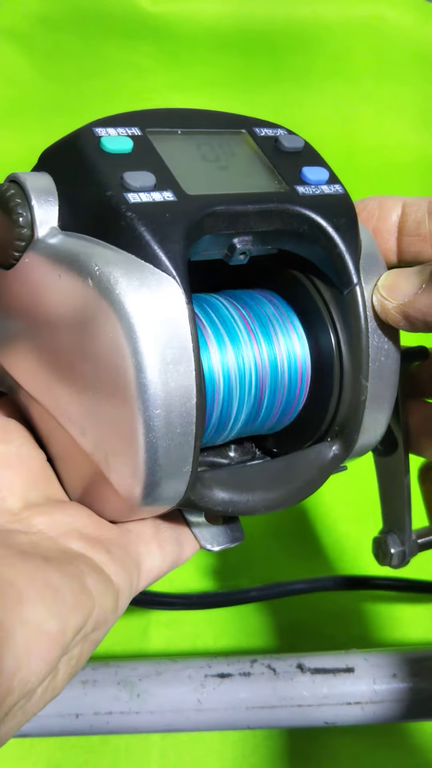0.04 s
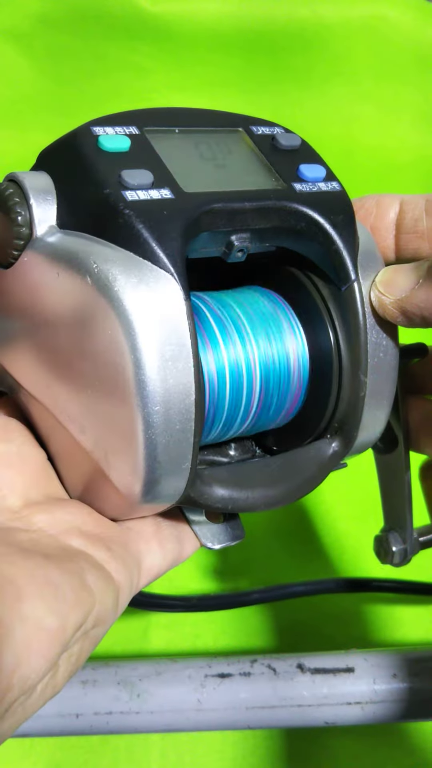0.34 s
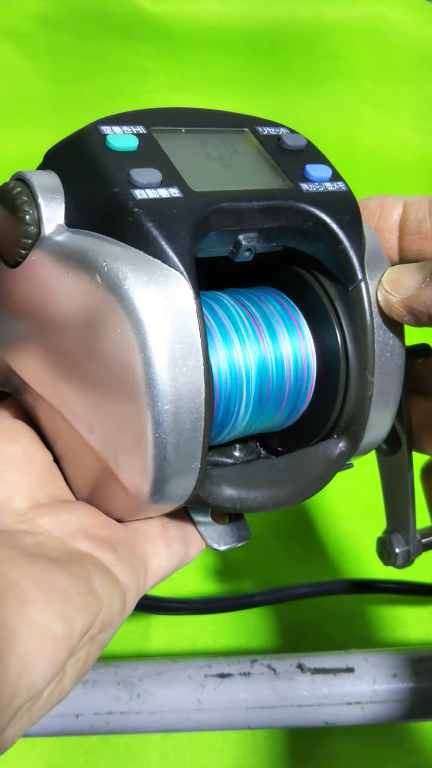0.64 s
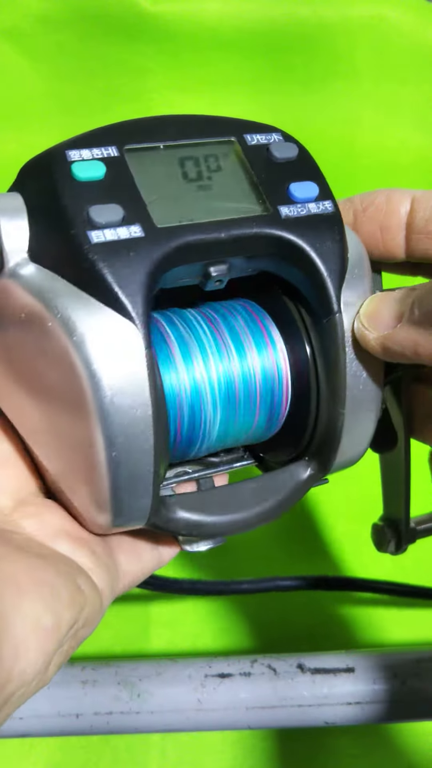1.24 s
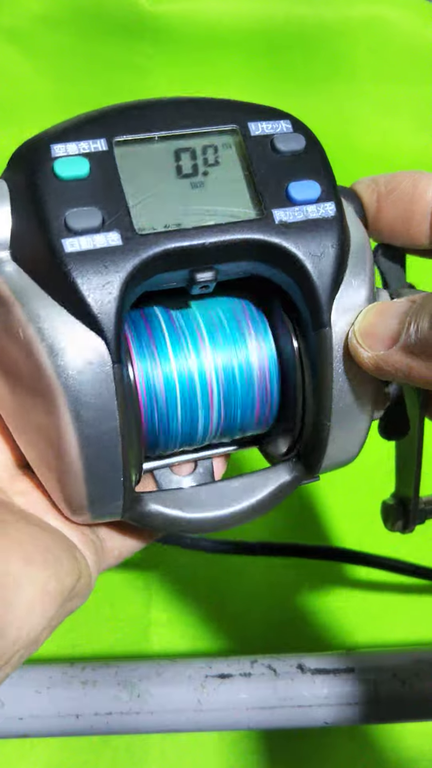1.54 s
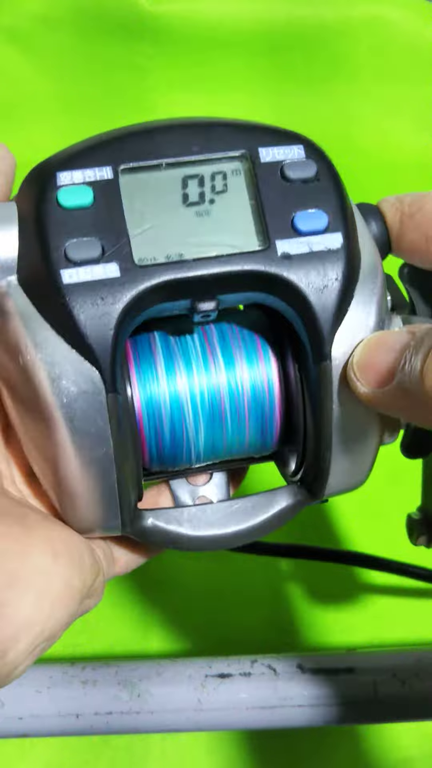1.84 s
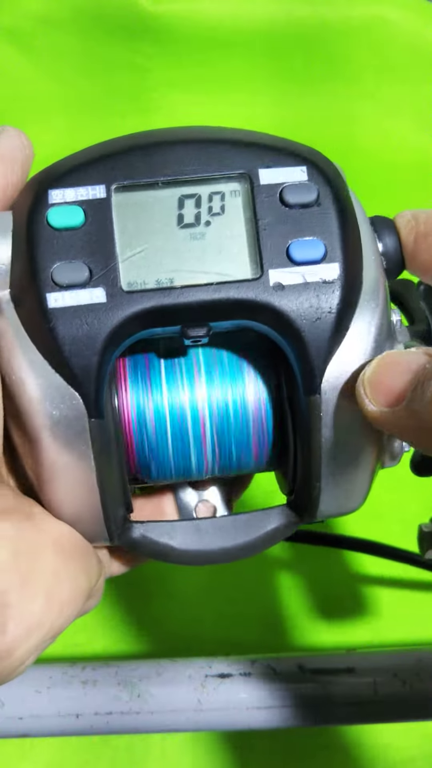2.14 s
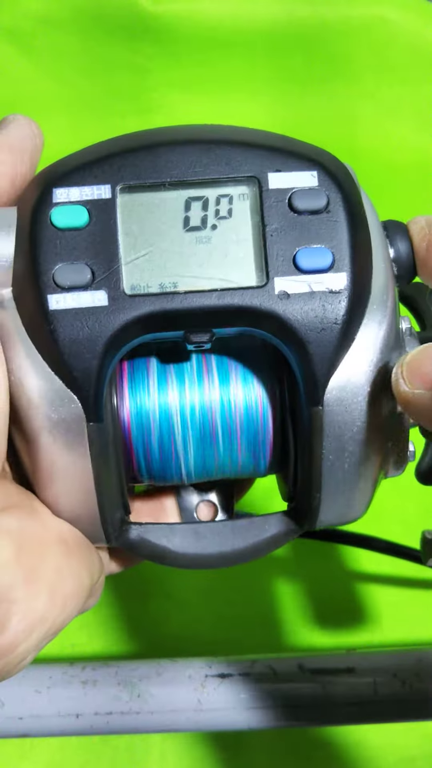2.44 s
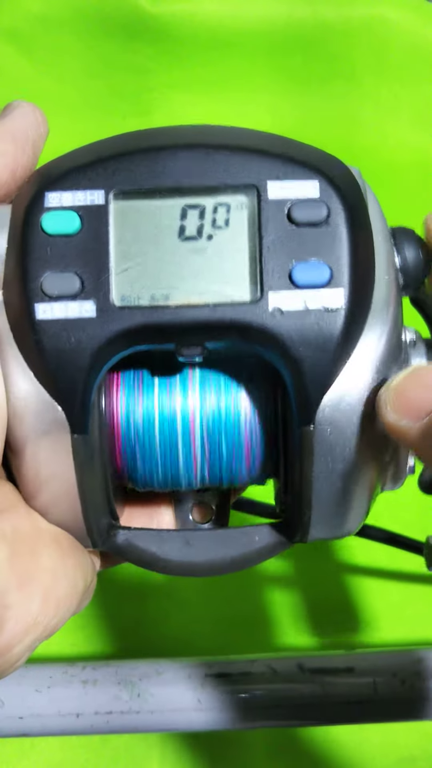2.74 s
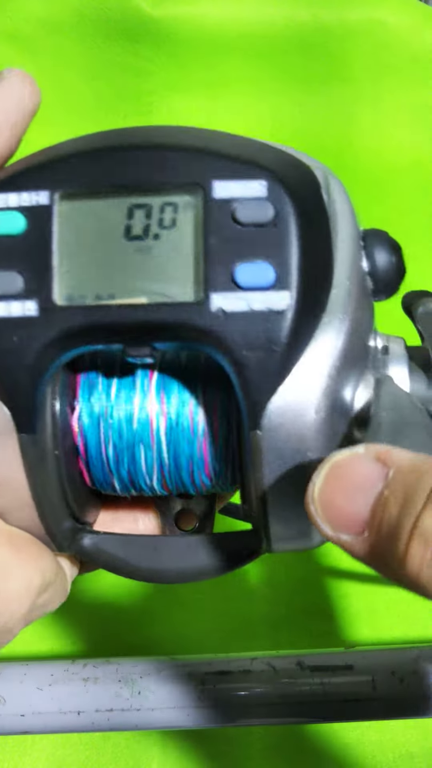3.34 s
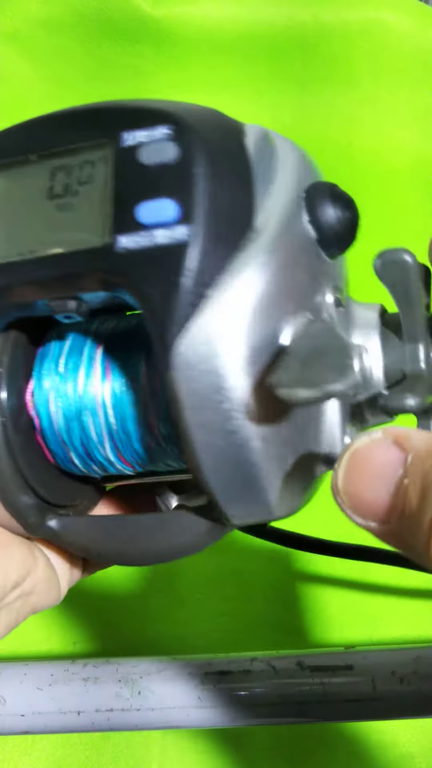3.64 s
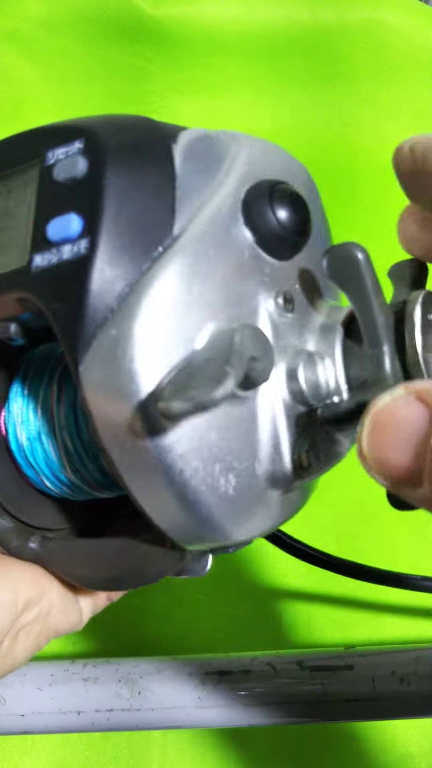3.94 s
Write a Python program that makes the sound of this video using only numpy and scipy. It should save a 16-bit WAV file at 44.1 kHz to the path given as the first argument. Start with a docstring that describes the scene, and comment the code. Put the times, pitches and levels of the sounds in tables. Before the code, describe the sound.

A small electric fishing reel motor whirs and rattles, then winds down to a stop.

```python
"""The small motor of a hand-held electric fishing reel spins its unloaded spool, close by: the rotor
hums, the mesh whines and gear teeth rattle the housing. The hand turns the reel from side plate to
front, which changes the colour of the whirr. At 2.7 s the power is cut and the reel coasts to rest,
growing duller. A few soft handling bumps and ticks remain over the mains hum of a quiet room."""
import sys
import numpy as np
from scipy import signal
from scipy.fft import rfft, irfft, next_fast_len
from scipy.io import wavfile
from scipy.ndimage import map_coordinates

SR = 44100
rng = np.random.default_rng(int(sys.argv[2]) if len(sys.argv) > 2 else 0)


def master(y):
    """Save y as 16-bit WAV."""
    cut = np.clip(np.atleast_2d(y).T, -1, 1)
    pcm = np.round(cut * 32767)  # scale
    wavfile.write(sys.argv[1], SR, pcm.astype(np.int16))


N = 176400
TIME_S = np.arange(N) / SR


def amp(db):
    return 10 ** (np.asarray(db) / 20)


def unit_rms(x):
    return x / np.sqrt(np.mean(x ** 2) + 1e-20)


def along(points, hz):
    """Interpolate (freq_hz, value) rows on a log axis."""
    freqs, values = np.transpose(points)
    return np.interp(np.log(hz + 1), np.log(freqs + 1), values)


def curve(rows):
    """One value per sample from (time_s, value) rows."""
    return np.interp(TIME_S, *np.transpose(rows))


def wobble(knots_per_s):
    """Smooth random curve of about unit size."""
    return map_coordinates(rng.standard_normal(4000), [TIME_S * knots_per_s], mode="wrap")


def filtered(x, response):
    """Apply a complex frequency response."""
    size = next_fast_len(N + SR // 2)
    return irfft(rfft(x, size) * response(np.fft.rfftfreq(size, 1 / SR)), size)[..., :N]


def coloured(x, *spectra):
    """Minimum-phase filter from summed (freq_hz, gain_db) spectra."""
    size = 2 * next_fast_len(N // 2 + SR // 4)
    hz = np.fft.rfftfreq(size, 1 / SR)
    gain = amp(sum(along(spectrum, hz) for spectrum in spectra))
    cepstrum = irfft(np.log(gain + 1e-6))
    cepstrum[1:size // 2] *= 2
    cepstrum[size // 2 + 1:] = 0
    return irfft(rfft(x, size) * np.exp(rfft(cepstrum)), size)[..., :N]


# stereo width: freq_hz, side_gain_db
STEREO_WIDTH = [(3000, -78), (4100, -83.5), (5200, -37), (6200, -14), (8000, -5.5), (11000, -6),
                (14000, -9.5)]

def stereo(pair):
    """Mid and side to left and right; the side widens only the treble."""
    side = filtered(pair[1], lambda hz: amp(along(STEREO_WIDTH, hz)))
    return np.array([pair[0] + side, pair[0] - side])


# room noise spectrum: freq_hz, gain_db
AIR_COLOUR = [(25, -24.5), (45, -10), (65, -2), (88, -15.5), (140, -14.5), (210, -20.5), (320, -13),
              (480, -21.5), (700, -26.5), (1200, -30.5), (2800, -32), (5000, -37.5), (6100, -49),
              (8000, -41), (10500, -38), (14200, -32.5)]
# mains and appliance hum: pitch_hz, level_db
HUM_TONES = [(59.2, -65), (119.5, -63), (285.3, -70), (468.3, -72), (2790, -80)]

def room(air_db=-58.5):
    """Low rumble, faint hiss and steady hum."""
    air = unit_rms(coloured(rng.standard_normal((2, N)), AIR_COLOUR))
    hum = sum(amp(db + wobble(23)) * np.sin(2 * np.pi * hz * TIME_S + 0.82 * wobble(18))
              for hz, db in HUM_TONES)
    return amp(air_db) * stereo(air) + np.sqrt(2) * hum


def walls(x, t60_s=0.32, gap_s=0.006, level_db=-10):
    """Short reverberation of a small room."""
    t = np.arange(SR // 2) / SR
    tail = rng.standard_normal(len(t)) * amp(-60 * t / t60_s) * (t > gap_s)
    return amp(level_db) * signal.fftconvolve(x, tail[None] / np.linalg.norm(tail), axes=1)[:, :N]


def glances(x, delays_s=(0.0007, 0.0011, 0.0017, 0.0026), drift_s=0.00006, level_db=-20):
    """Treble glances off the moving hand and reel; the drifting delays comb it."""
    treble = filtered(x, lambda hz: hz ** 3 / (hz ** 3 + 3500 ** 3))
    for delay_s in delays_s:
        sent_s = TIME_S - (delay_s + drift_s * wobble(1.604))
        x = x + amp(level_db) * np.array([np.interp(sent_s, TIME_S, ch, left=0) for ch in treble])
    return x


def touches(rows, colour, attack_s):
    """Dying noise bursts where the hand meets the reel."""
    envelope = np.zeros(N)
    for start_s, level_db, t60_s in rows:
        age_s = np.maximum(TIME_S - start_s, 0)
        envelope += amp(level_db - 60 * age_s / t60_s) * (1 - np.exp(-age_s / attack_s))
    noise = filtered(rng.standard_normal(N), lambda hz: amp(along(colour, hz)))
    return envelope * unit_rms(noise)


# hand contacts: start_s, level_db, t60_s
HAND_BUMPS = [(3.286, -46, .055), (3.312, -43, 0.05), (3.329, -52, .05), (3.686, -58, .06)]
GRIP_TICKS = [(3.489, -56.5, .04), (3.599, -59, .03), (3.686, -57, .05), (3.727, -55.5, .05),
              (3.741, -55, .04), (3.789, -49.5, .055), (3.892, -59, .05)]
# their spectra: freq_hz, gain_db
BUMP_SPECTRUM = [(60, -16), (200, -23), (320, 4), (600, 0), (1000, -16), (3000, -18), (10000, -48.5)]
TICK_SPECTRUM = [(200, 1.5), (800, 1), (2200, 2.5), (3200, -7.5), (5200, -13), (6200, -21.5),
                 (14000, -20.5)]

def handling():
    """Soft bumps of hand on reel and plastic ticks of the shifting grip."""
    bumps = touches(HAND_BUMPS, BUMP_SPECTRUM, attack_s=0.002)
    ticks = touches(GRIP_TICKS, TICK_SPECTRUM, attack_s=0.0015)
    return bumps + ticks


# rotor hum: time_s, level_db
ROTOR_LEVEL = [(0, -48), (.7, -47), (1.2, -43.5), (1.7, -40), (2.2, -39), (2.72, -39), (2.76, -38),
               (2.79, -44.5), (2.9, -53), (3.0, -65), (3.15, -73), (3.35, -100)]
# whine partials: cycles_per_turn
PARTIAL_ORDERS = [2, 11 / 3, 5, 22 / 3, 9, 11]
# per partial: full_speed_level_db, jitter_rad
PARTIALS = [(-61.5, 0.98), (-36.5, 0.45), (-46.5, .4), (-42, 1), (-38, 0.5), (-47.5, 0.84)]

def motor(turns, speed, whine_exponent=6.6):
    """Rotor unbalance hums once a turn; commutator and gear mesh add a rougher whine."""
    hum = amp(curve(ROTOR_LEVEL) + 0.66 * wobble(4.1)) * np.sin(2 * np.pi * turns)
    whine = 0
    for order, (level_db, jitter_rad) in zip(PARTIAL_ORDERS, PARTIALS):
        gain = amp(level_db + 0.56 * wobble(40))
        jitter = jitter_rad * (wobble(25) + 0.3 * wobble(130))
        whine += gain * np.sin(2 * np.pi * order * turns + jitter)
    return np.sqrt(2) * (hum + whine * speed ** whine_exponent)


# per gear wheel: swells_per_turn
WHEEL_RATES = [1 / 6, 1 / 3, .104, .114, .193]
# per gear wheel: depth_db
WHEEL_DEPTHS = [1.1, 0.7, 0.5, 0.9, .7]

def wheel_swell(turns):
    """Out-of-true wheels press and release the mesh, each at its own rate; in dB."""
    return sum(depth_db * np.cos(2 * np.pi * (rate * turns + rng.random()) + 0.27 * wobble(5.2))
               for rate, depth_db in zip(WHEEL_RATES, WHEEL_DEPTHS))


def resonance(hz, centre_hz, width_hz):
    """Response of one damped mode."""
    return 1j * hz * width_hz / (centre_hz ** 2 - hz * hz + 1j * hz * width_hz)


def knocks(swell_db, pitch_hz=1344, stage_width_hz=446):
    """The gear train knocks in the housing when the wheels press hardest together."""
    peaks = signal.find_peaks(swell_db, distance=SR // 90)[0]
    blows = np.bincount(peaks, amp(3.8 * np.minimum(swell_db[peaks], 3)), N)
    return unit_rms(filtered(blows, lambda hz: resonance(hz, pitch_hz, stage_width_hz) ** 3))


def tooth_hits(turns, speed, hits_per_turn=11, scatter_db=5, limit_sigma=1.6, rub_db=-4):
    """Teeth clatter in their backlash: loosely timed, uneven clicks over sliding noise."""
    count = int(turns[-1] * hits_per_turn)
    lateness, force = rng.standard_normal((count, 2)).T
    hit_turns = (np.arange(count) + 0.4 * lateness) / hits_per_turn
    hit_samples = np.interp(hit_turns, turns, np.arange(N)).astype(int)
    sizes = amp(scatter_db * np.minimum(force, limit_sigma))
    clicks = np.bincount(hit_samples, sizes * rng.choice([-1, 1], count), N)
    return unit_rms(clicks / np.sqrt(speed + 0.1)) + amp(rub_db) * rng.standard_normal(N)


# bands of the housing parts: edge_hz
PART_EDGES = [0, 2800, 5800, 9300, 15000]
# per part: swell_share, clump_db
HOUSING_PARTS = [(0.66, 1.15), (1, 1), (0.28, 1.77), (.8, 1.73)]

def clatter(turns, speed, swell_db, play_limit_db=3.2):
    """Tooth hits swell up to the wheels' play; each housing part clatters in its own clumps."""
    hits = np.array([tooth_hits(turns, speed), tooth_hits(turns, speed)])
    pressed_db = play_limit_db * np.tanh(swell_db / play_limit_db)
    drive = 0
    for low_hz, high_hz, (share, clump_db) in zip(PART_EDGES, PART_EDGES[1:], HOUSING_PARTS):
        band = filtered(hits, lambda hz: (hz >= low_hz) & (hz < high_hz))
        gain_db = share * pressed_db + clump_db * wobble(170) + 0.65 * wobble(8)
        drive += band * unit_rms(amp(gain_db))
    return drive


# housing spectrum from three sides: freq_hz, gain_db
SIDE_COLOUR = [(290, -50.5), (500, -25), (966, -23.5), (1390, 1), (1470, -14), (1620, -13), (2000, -2.5),
               (2430, -2.5), (2650, -8.5), (3090, -5.5), (3500, -1), (3750, -5), (4320, 1), (4600, -1),
               (4880, -7), (5280, -2), (5800, -10), (6950, -11), (7350, -8), (8600, -9), (9150, -15.5),
               (9600, -14), (12600, -15), (14200, -12.5)]
CORNER_COLOUR = [(290, -45), (500, -26.5), (544, -22), (626, -31.5), (979, -24.5), (1410, -6),
                 (1490, -12.5), (1580, -17.5), (2030, -6), (2720, -12.5), (3450, -1), (3860, -5.5),
                 (4200, 0.5), (4700, -10.5), (5400, -8), (5960, -18), (6570, -20), (7890, -17.5),
                 (9200, -19.5), (13200, -18), (14200, -19)]
FRONT_COLOUR = [(290, -49.5), (500, -26), (559, -24.5), (652, -28.5), (772, -22), (939, -27.5), (1110, -14),
                (1350, -9), (1410, -6), (1490, -12), (1550, -13), (2110, -3.5), (2430, -3.5), (2760, -10.5),
                (3360, -4), (3650, 3.5), (4700, -4.5), (5800, -16), (6860, -10.5), (9330, -17.5),
                (11000, -15), (12000, -17), (14200, -13.5)]
# when each side faces the microphone: time_s
FACING_TIMES = [0.96, 1.42, 2.02]
# rattle lost to the knock: freq_hz, gain_db
KNOCK_DIP = [(900, 0), (1330, -1), (1700, -0.5)]
# narrow housing modes: peak_s, half_length_s, pitch_hz, width_hz, lift_db
HOUSING_MODES = [(0.45, 0.8, 10830, 330, 7), (0.45, 0.7, 13700, 450, 5), (1.17, 0.32, 5300, 330, 6),
                 (1.45, 0.3, 4335, 120, 6), (1.38, .25, 7800, 280, 5.5), (1.38, .17, 10470, 300, 6.5),
                 (1.7, .55, 3560, 100, 3.5), (2.45, 0.85, 6750, 450, 4.5), (2.353, .35, 11250, 500, 4.5),
                 (2.6, 0.35, 4560, 250, 2.5), (3.08, .05, 9900, 220, 8)]

def housing(drive, grip_waver_db=1.5):
    """The ringing housing turns: its sides crossfade and narrow modes sweep past the microphone."""
    rattle = 0
    for weights, colour in zip(np.eye(3), [SIDE_COLOUR, CORNER_COLOUR, FRONT_COLOUR]):
        facing = np.interp(TIME_S, FACING_TIMES, weights)
        rattle += facing * unit_rms(coloured(drive, colour, KNOCK_DIP))
    for peak_s, half_length_s, pitch_hz, width_hz, lift_db in HOUSING_MODES:
        facing = np.exp(-((TIME_S - peak_s) / half_length_s) ** 2)
        lift = amp(facing * (lift_db + grip_waver_db * wobble(13))) - 1
        rattle += lift * filtered(rattle, lambda hz: resonance(hz, pitch_hz, width_hz))
    return rattle


# rattle envelope: time_s, relative_db
RATTLE_LEVEL = [(0, -24), (.85, -23.5), (1.4, -23), (2.1, -22), (2.66, -23), (2.82, -25.5), (3.03, -30.5),
                (3.17, -39), (3.25, -50), (3.33, -58), (3.45, -66.5), (3.65, -100)]
# tilt at standstill: freq_hz, gain_db
COAST_TILT = [(200, 16.5), (550, 14), (800, 10), (1200, 4.5), (2500, 1.5), (4000, -1.5), (6500, 0),
              (14000, -9)]

def gears(turns, speed, trim_db=-0.73, knock_db=-17):
    """Clatter and knocks ring the housing, duller as the gears slow."""
    swell_db = wheel_swell(turns)
    drive = clatter(turns, speed, swell_db)
    drive = speed * drive + (1 - speed) * coloured(drive, COAST_TILT)
    rattle = stereo(housing(drive))
    knocking = amp(knock_db) * speed ** 2 * knocks(swell_db)
    return amp(curve(RATTLE_LEVEL) + trim_db) * (rattle + knocking)


# motor speed: time_s, turns_per_s
MOTOR_RATE = [(0, 389), (.45, 392), (.9, 392.4), (1.3, 394), (2.1, 395.4), (2.705, 394.6), (2.8, 326),
              (2.9, 258), (3.0, 196), (3.15, 105), (3.3, 12), (3.4, 0)]

def scene():
    """One speed curve drives gears and motor, over handling and room."""
    turns_per_s = curve(MOTOR_RATE)
    turns = np.cumsum(turns_per_s) / SR
    speed = turns_per_s / turns_per_s.max()
    whirr = glances(gears(turns, speed))
    return whirr + walls(whirr) + motor(turns, speed) + handling() + room()


def record(dry, top_hz=14300):
    """Brick-wall low-pass."""
    return filtered(dry, lambda hz: hz < top_hz)


dry = scene()
out = record(dry)
master(out)
```